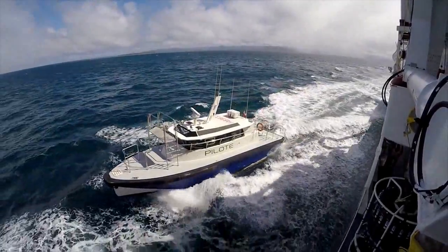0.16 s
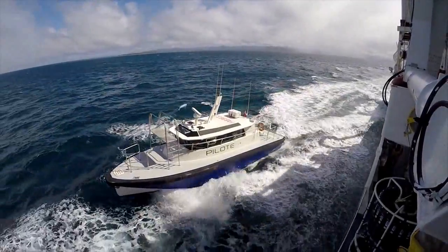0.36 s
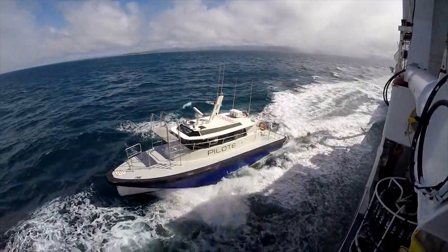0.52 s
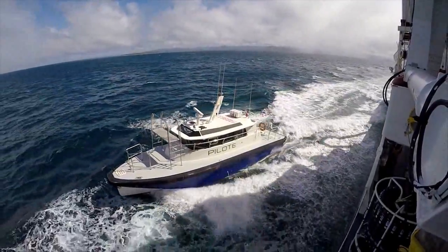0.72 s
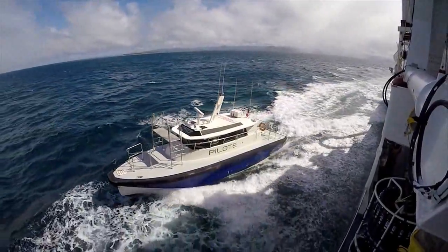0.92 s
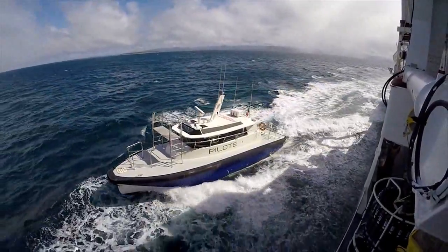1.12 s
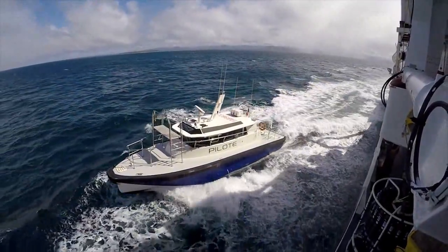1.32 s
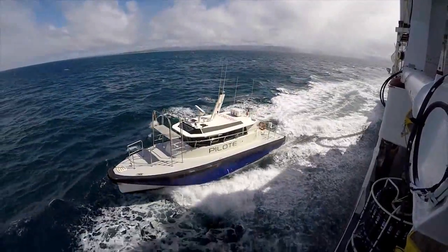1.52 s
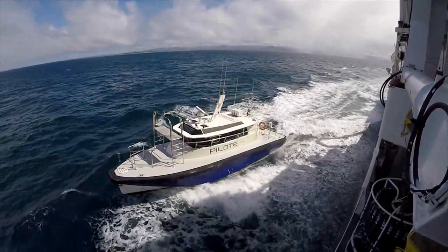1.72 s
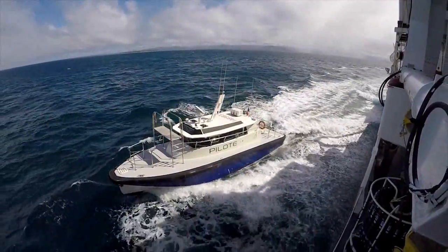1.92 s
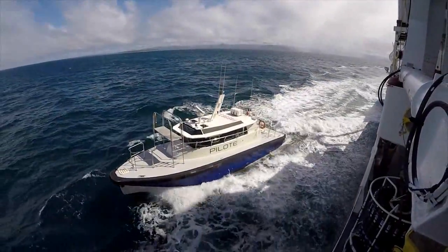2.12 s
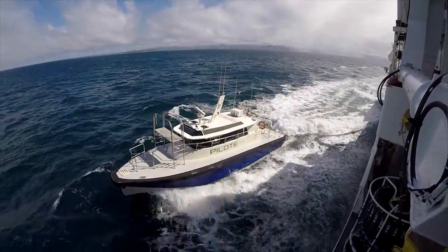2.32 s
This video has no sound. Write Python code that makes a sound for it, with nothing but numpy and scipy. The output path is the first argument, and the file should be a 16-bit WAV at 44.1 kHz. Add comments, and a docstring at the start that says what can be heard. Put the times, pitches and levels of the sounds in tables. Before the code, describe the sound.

A boat's diesel engine drones at a steady low pitch for the whole two and a half seconds, heard from a deck above. The exhaust flutters and rasps, turning slightly muffled now and then. Brief hollow gurgles come at about 0.5 and 1.4 seconds, and most clearly near 1.9. Underneath, the bow wave hisses and fizzes continuously and a light, gusty wind rumbles.

```python
"""Diesel launch alongside a ship

The launch runs at steady speed at sea, heard from the deck above. Its six-cylinder exhaust drones,
flutters with the unequal cylinders and is muffled now and then as the stern dips.
Water gurgles at the exhaust, the bow wave hisses and fizzes, and a light wind rumbles."""
import sys
import numpy as np
from scipy import signal
from scipy.fft import rfft, irfft, next_fast_len
from scipy.io import wavfile

SR = 44100
rng = np.random.default_rng(int(sys.argv[2]) if len(sys.argv) > 2 else 0)


def wav_record(signal):
    """Record a signal, one row per channel, as 16-bit PCM in the file named by sys.argv[1]."""
    frames = np.transpose(np.atleast_2d(signal))
    bounded = np.clip(frames, -1, 1)
    # unit amplitude maps onto the largest positive 16-bit level
    quanta = np.round(bounded * 32767).astype(np.int16)
    wavfile.write(sys.argv[1], SR, quanta)


N = 108177


def exhaust():
    """Drone, flutter, rasp and gurgle, all locked to the firings."""
    # firing rate: time_s, rate_hz
    firing = [(0, 81.57), (.5, 81.88), (1.45, 81.85), (1.9, 81.65), (2.45, 81.8)]
    # how freely the exhaust sounds, low as the stern dips: time_s, level_db
    openness = [(0, -31.5), (.1, -34.5), (.19, -26.5), (.42, -28), (.6, -30), (.75, -30), (.88, -28),
                (1.02, -28.5), (1.15, -31), (1.4, -30), (1.57, -26.5), (1.68, -30.5), (1.8, -27),
                (2.0, -27), (2.12, -31.5), (2.3, -30.5), (2.45, -27)]
    firing_hz, = in_time(firing)
    open_db, = in_time(openness)
    phase = 2 * np.pi * np.cumsum(firing_hz) / SR
    breath = rasp(phase, open_db)
    return drone(phase) + flutter(phase, firing_hz.mean(), open_db) + breath + gurgle(phase)


def drone(phase):
    """Firing pulse; the pipe turns the overtones a quarter cycle, so each pulse rebounds."""
    # firing harmonics: time_s, first_db, second_db, third_db
    harmonics = [(0, -18, -18.5, -23), (.12, -16, -26, -17), (.17, -14, -16.5, -20.5),
                 (.34, -16, -17.5, -18.5), (.46, -16, -18.5, -24.5), (.68, -16.5, -22.5, -25.5),
                 (.75, -17, -26, -38), (.8, -17.5, -26, -30), (.86, -14.3, -18, -22.5),
                 (1.0, -14.7, -17, -19.5), (1.17, -15.7, -18.7, -24.5), (1.45, -16, -18, -24),
                 (1.645, -16, -17.5, -26), (1.7, -15.3, -35, -31), (1.78, -14.8, -18.5, -24),
                 (2.02, -15.3, -18, -21), (2.22, -15, -20.5, -19.5), (2.45, -15.8, -16, -23.5)]
    return sum(np.sqrt(2) * from_db(db) * np.cos(k * phase + (k > 1) * np.pi / 2)
               for k, db in enumerate(in_time(harmonics), start=1))


def flutter(phase, firing_hz, open_db):
    """Unequal cylinders add wavering tones at multiples of the whole engine cycle."""
    # weaker exhaust tones: cycle_multiple, relative_db
    cycle_tones = [(2, -12), (3, -2.5), (4, -7.5), (5, -2.5), (7, -12), (8, -17.5), (9, -2.5), (11, 0.5),
                   (13, -28), (14, -10.5), (15, -5.5), (16, -14.5), (17, -4.5), (19, -4.5), (20, -21),
                   (21, -5), (22, -12.5), (23, -11.5), (24, -15), (26, -21.5), (27, -6.5), (28, -14),
                   (29, -11), (30, -11.5), (33, -17.5), (35, -19.5), (40, -14), (43, -22), (44, -23),
                   (46, -22), (48, -23), (52, -20), (57, -22), (58, -21), (64, -25)]
    cylinders, muffled_above_hz = 6, 400
    base_db = open_db.mean() - 1.3
    swing_db = 2.2 * (open_db - open_db.mean())  # upper tones fade more than the rasp
    tones = np.zeros(N)
    for multiple, relative_db in cycle_tones:
        ratio = multiple / cylinders
        swing_share = 1 / (1 + (muffled_above_hz / (ratio * firing_hz)) ** 2)
        level_db = base_db + relative_db + swing_share * swing_db
        unsteadiness = .5 + swing_share
        angle_rad = ratio * phase + rng.uniform(0, 2 * np.pi) + .4 * unsteadiness * drift(3.4)
        waver_db = 1.5 * unsteadiness * drift(3.8)
        tones += np.sqrt(2) * from_db(level_db + waver_db) * np.cos(angle_rad)
    return tones


def rasp(phase, open_db):
    """Rough breath of each firing."""
    # rasp spectrum: frequency_hz, density_db
    spectrum = [(90, -23), (150, -8), (250, -1), (320, -1.5), (400, -1.5), (480, -7.5), (580, -10),
                (700, -15), (900, -16), (1400, -30)]
    return from_db(open_db - 4) * coloured(puffs(phase, pulsing=.71), spectrum)


def gurgle(phase):
    """Firings blow through the wet outlet, which rings hollow and swells as water washes past."""
    # water at the outlet: peak_s, half_width_s, level_db
    surges = [(.36, .04, -45), (.50, .025, -34), (.57, .025, -44), (1.15, 0.077, -41), (1.38, .04, -37.5),
              (1.5, .03, -45), (1.6, .02, -40), (1.79, 0.056, -42), (1.9, .03, -31.5), (1.965, .014, -32),
              (2.04, .03, -41.5), (2.24, .04, -41), (2.42, 0.044, -44)]
    ring_hz, width_hz, rest_db = 800, 110, -51
    t = np.arange(N) / SR
    swell = from_db(rest_db) + sum(from_db(level_db) * np.exp(-((t - peak_s) / half_width_s) ** 2)
                                   for peak_s, half_width_s, level_db in surges)
    outlet = puffs(phase, pulsing=.8)
    for _ in range(2):
        outlet = resonance(outlet, ring_hz, width_hz)
    return swell * rms_one(outlet)


def bow_wave():
    """A smooth wash of foam, and above it spray full of tiny drops."""
    # rush of the wave: time_s, wash_db, spray_db
    levels = [(0.03, -41.5, -53), (0.4, -41, -49), (0.5, -41.5, -49.5), (0.69, -39.5, -47.5),
              (1.15, -43, -54.5), (1.2, -42, -53), (1.41, -44, -55), (1.57, -41.5, -51.5),
              (2.0, -39.5, -52), (2.07, -43, -55), (2.29, -40.5, -51.5), (2.41, -40.5, -51)]
    # foam spectrum: frequency_hz, density_db
    wash_spectrum = [(400, 0.5), (800, 0), (1100, 1), (1350, -2.5), (1600, -4), (1950, 0.5), (2250, -3),
                     (2700, 0.5), (2950, -2), (3150, -5.5), (3550, -8.5), (3850, -0.5), (4250, -9),
                     (5000, -10), (5500, -9), (7000, -18), (11000, -28)]
    # spray spectrum: frequency_hz, density_db
    spray_spectrum = [(3000, -15), (4500, 0.5), (6200, 0.5), (7000, -1.5), (7800, -2.5), (9000, -6),
                      (10500, -7), (12000, -11)]
    drops_per_s = 2500
    wash_db, spray_db = in_time(levels)
    flicker_db = .64 * drift(17)
    wash = from_db(wash_db + 1.77 + flicker_db) * coloured(rng.standard_normal(N), wash_spectrum)
    drop_db = 3 * np.minimum(rng.exponential(1, N), 5)
    impulses = from_db(drop_db) * rng.choice([-1, 1], N)
    drops = rms_one(impulses * (rng.random(N) < drops_per_s / SR))
    fizz = rng.standard_normal(N) + .42 * drops
    return wash + from_db(spray_db + 1.5) * coloured(fizz, spray_spectrum)


def wind():
    """Gusty low rumble of wind and sea."""
    # rumble spectrum: frequency_hz, density_db
    spectrum = [(10, -26), (22, -6), (38, -4.5), (60, -3.5), (100, -10), (200, -14), (400, -25.5),
                (1000, -33.5)]
    level_db, gust_db = -32.5, 2
    return from_db(level_db + gust_db * drift(3.3)) * coloured(rng.standard_normal(N), spectrum)


def puffs(phase, pulsing):
    """Turbulence that swells with every firing."""
    return rng.standard_normal(N) * np.exp(pulsing * np.cos(phase))


def resonance(x, centre_hz, width_hz):
    """Two-pole band-pass."""
    r = np.exp(-np.pi * width_hz / SR)
    return signal.lfilter([1, 0, -1], [1, -2 * r * np.cos(2 * np.pi * centre_hz / SR), r * r], x)


def coloured(x, spectrum):
    """Shape x by a spectrum, falling 12 dB per octave past its ends; rms 1."""
    hz, db = np.transpose(spectrum)
    size = next_fast_len(N)
    bins_hz = np.maximum(np.arange(size // 2 + 1) * SR / size, 1)
    skirt = np.minimum(bins_hz / hz[0], 1) ** 2 * np.minimum(hz[-1] / bins_hz, 1) ** 2
    gain = from_db(np.interp(np.log(bins_hz), np.log(hz), db))
    return rms_one(irfft(rfft(x, size) * skirt * gain, size)[:N])


def drift(corner_hz):
    """Slow random wander; rms 1."""
    hop, settle = 40, 2000
    r = np.exp(-2 * np.pi * corner_hz * hop / SR)
    noise = rng.standard_normal(N // hop + settle + 2)
    slow = signal.lfilter([1], [1, -2 * r, r * r], noise)[settle:]
    return np.interp(np.arange(N) / hop, np.arange(len(slow)), rms_one(slow))


def in_time(rows):
    """Each column after time_s, interpolated per sample."""
    time_s, *columns = np.transpose(rows)
    return [np.interp(np.arange(N) / SR, time_s, column) for column in columns]


def from_db(db):
    """Decibels to gain."""
    return 10 ** (np.asarray(db) / 20)


def rms_one(x):
    """Scale to unit power."""
    return x / np.sqrt(np.mean(x ** 2) + 1e-20)


def scene():
    """Engine, water and wind in one channel."""
    return (exhaust() + bow_wave() + wind())[None, :]


def record(dry):
    """Click-free ends and a steep low-pass."""
    fade_s, cutoff_hz = .002, 11900
    from_edge_s = np.minimum(np.arange(N), np.arange(N)[::-1]) / SR
    fade = np.minimum(from_edge_s / fade_s, 1)
    lowpass = signal.ellip(12, .1, 80, cutoff_hz, fs=SR, output="sos")
    return signal.sosfilt(lowpass, dry * fade)


dry = scene()
out = record(dry)
wav_record(out)
```